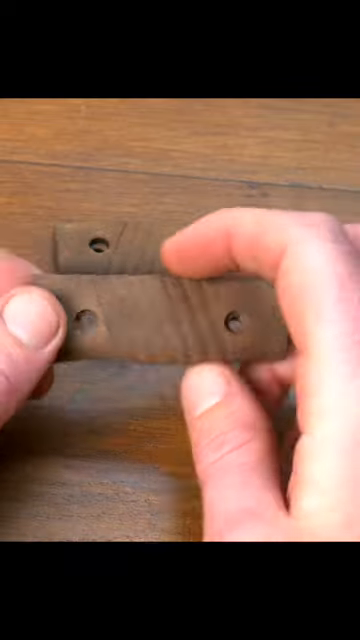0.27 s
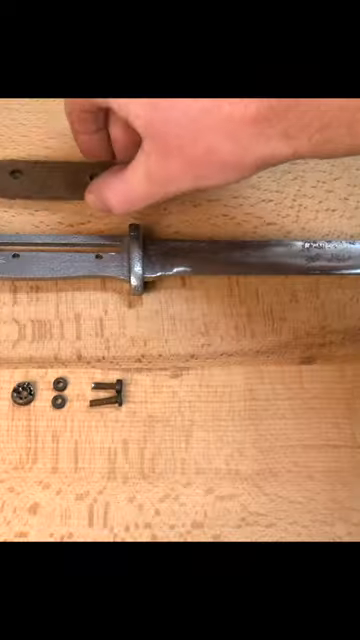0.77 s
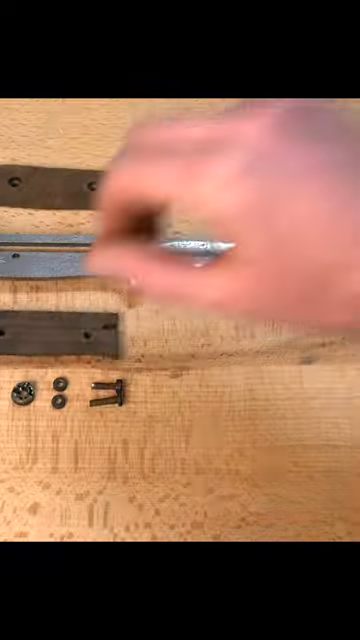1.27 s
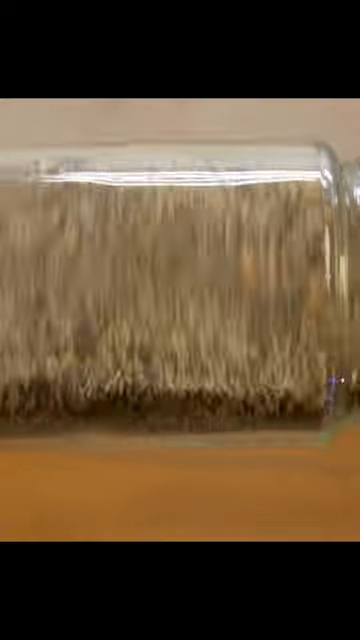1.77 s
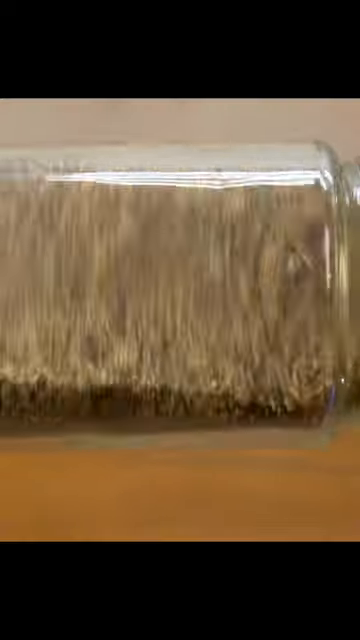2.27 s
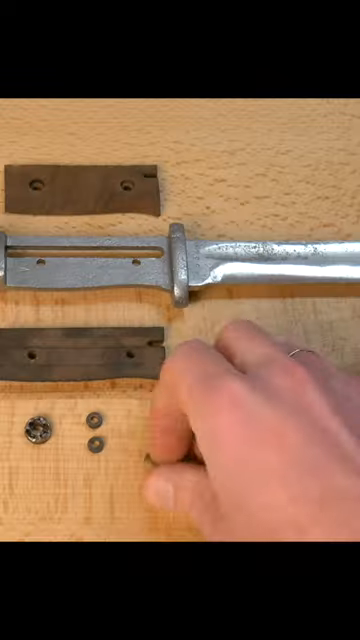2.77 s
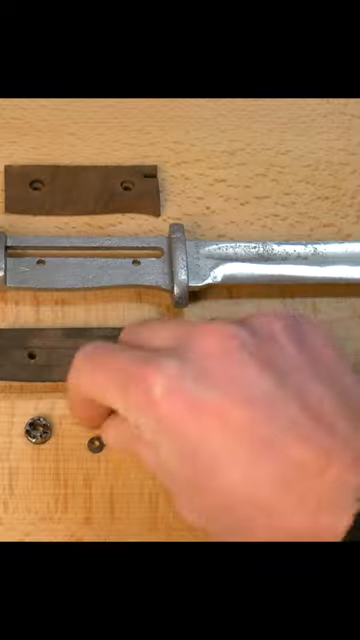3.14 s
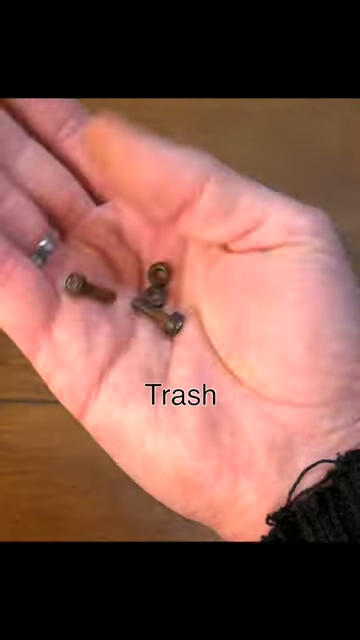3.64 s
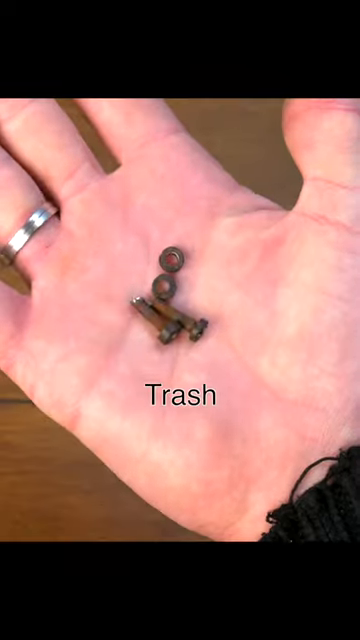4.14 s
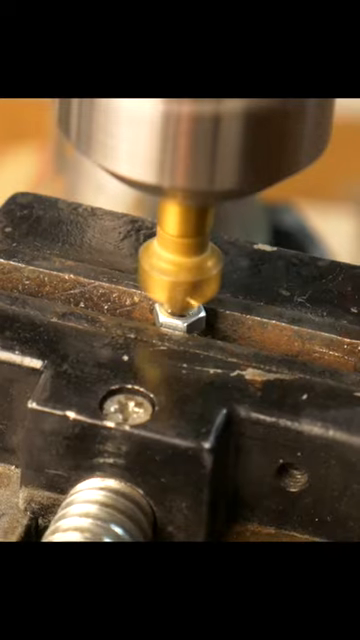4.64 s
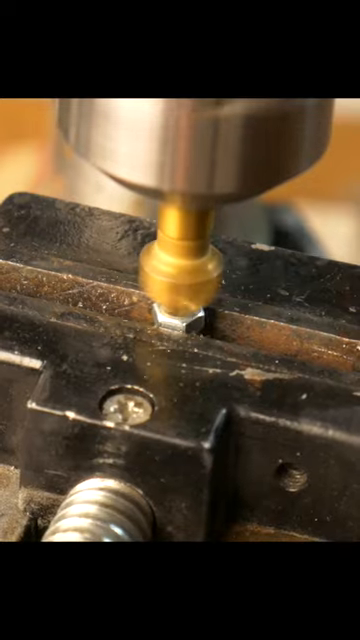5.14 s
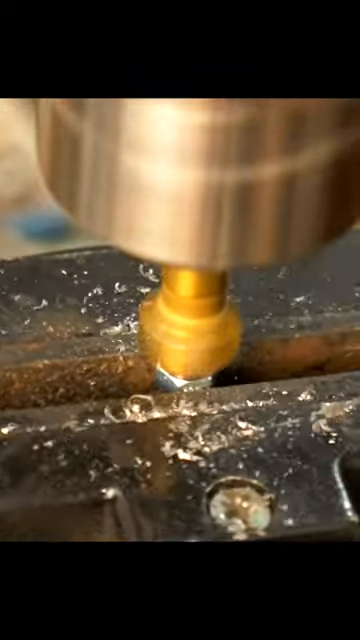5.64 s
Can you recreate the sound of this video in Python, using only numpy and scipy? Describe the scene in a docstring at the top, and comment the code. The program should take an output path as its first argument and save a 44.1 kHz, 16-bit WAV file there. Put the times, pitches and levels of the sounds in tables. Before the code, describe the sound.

Recorded closely with almost no reverberation: faint handling and one sharp wooden clack, a jar rattle and knock, then a second of steady gritty whirring. Quiet picking of small metal parts follows, then a near-silent pause, a quick bright sweep of screws with a hand thump, buzzing drill-press countersinking with brief squeals, and finally harsh belt grinding.

```python
"""Workshop steps in quick succession, close and dry, over a low rumble and a faint hiss.
A wooden knife grip clacks on a bench and a lidded jar is knocked: forces drive each object's resonances.
The jar then tumbles grit on a whining motor: grain noise, struck glass and wavering tones. Small parts are
picked up amid brushing fingers, then screws are swept onto a table: knocks and rubbing slips. A drill press
countersinks a nut in a vise: hum, rattle and cutting noise. A screw is ground on a belt: scratching and tones."""
import sys
import numpy as np
from scipy.fft import rfft, irfft, next_fast_len
from scipy.io import wavfile
from scipy.ndimage import map_coordinates

SR = 44100
rng = np.random.default_rng(int(sys.argv[2]) if len(sys.argv) > 2 else 0)


def put_to_file(sound):
    """Save the sound as 16-bit audio at rate SR, in the file named by the first command-line argument."""
    columns = np.atleast_2d(sound).T  # one column per channel
    safe = np.clip(columns, -1, 1)
    whole_steps = np.round(safe * 32767)
    wavfile.write(sys.argv[1], SR, whole_steps.astype(np.int16))


N = 260631
TIME = np.arange(N) / SR


def amp(db):
    """Logarithmic level: decibels to amplitude gain."""
    return 10 ** (np.asarray(db) / 20)


def unit(x):
    """Normalisation: scale to rms 1."""
    return x / np.sqrt(np.mean(x ** 2) + 1e-20)


def curves(rows):
    """Linear interpolation: one value per sample for each column after the time."""
    s, *columns = np.transpose(rows)
    return [np.interp(TIME, s, column) for column in columns]


def wobble(rate):
    """Slow random modulation: a smooth curve through rate random knots a second."""
    knots = rng.standard_normal(int(N * rate / SR) + 4)
    return map_coordinates(knots, [TIME * rate])


def gate(start, end, fade):
    """Switching envelope: 1 between start and end, with linear ramps of fade seconds just inside."""
    return np.clip((TIME - start) / fade, 0, 1) * np.clip((end - TIME) / fade, 0, 1)


def filtered(x, response):
    """Linear filtering: multiply the spectrum by a complex response of frequency."""
    size = next_fast_len(x.shape[-1] + 8192)  # padding gives the response room to ring out
    spectrum = rfft(x, size) * response(np.fft.rfftfreq(size, 1 / SR))
    return irfft(spectrum, size)[..., :x.shape[-1]]


def coloured(x, spectrum):
    """Spectral shaping: x weighted by (Hz, dB) points joined on a log-frequency axis, at rms 1."""
    f, db = np.transpose(spectrum)
    return unit(filtered(x, lambda hz: amp(np.interp(np.log(hz + 1), np.log(f + 1), db))))


def ringing(x, modes):
    """Modal response: a body's resonances summed, keeping the power of a white input."""
    def response(f):
        total = 0
        for k, (centre, width, db) in enumerate(modes):
            resonance = 1j * f * width / (centre * centre - f * f + 1j * f * width)
            total = total + (-1) ** k * amp(db) * resonance  # neighbours have opposite signs
        return total / np.sqrt(np.mean(abs(total) ** 2))
    return filtered(x, response)


def softened(force, hz):
    """Contact compliance: a softer contact passes less treble, as a second-order low-pass at hz."""
    return filtered(force, lambda f: 1 / (1 + 1j * np.sqrt(2) * f / hz - (f / hz) ** 2))


def grains(rate, size=N):
    """Shot noise: tiny impacts of random strength, on average rate a second, at rms 1."""
    return unit(rng.standard_normal(size) * (rng.random(size) < rate / SR))


def tones(lines, drift, flicker_db):
    """Rotating-machine lines: tones (Hz, dB) follow one wavering speed, each swelling on its own."""
    clock = np.cumsum(1 + drift * wobble(7)) / SR
    total = 0
    for hz, db in lines:
        level = np.sqrt(2) * amp(db + flicker_db * wobble(18))
        total = total + level * np.sin(2 * np.pi * (hz * clock + rng.random()))
    return total


# spectra of the room's rumble and hiss: pitch_hz [Hz], level_db [dB per Hz, relative]
RUMBLE = [(12, -37), (20, -5.5), (97, -4), (217, -13), (377, -32.5), (409, -44), (443, -41), (500, -41),
          (650, -81), (1100, -120)]
HISS = [(180, -40), (300, -2), (366, -2), (404, -9), (439, -2), (535, -7), (2360, -17.5), (15500, -28.5)]
# mean level of the rumble: time_s [s], level_db [dB]
RUMBLE_LEVEL = [(0, -64.5), (1.1, -65), (2.6, -56.5), (3.35, -59.5), (3.9, -56)]
RUMBLE_SWAY_DB, HISS_DB = 2, -69.5


def room():
    """Ambient noise: a gently swaying low rumble under a faint, steady hiss, both filtered random noise."""
    rumble_db, = curves(RUMBLE_LEVEL)
    rumble = amp(rumble_db + RUMBLE_SWAY_DB * wobble(11)) * coloured(rng.standard_normal(N), RUMBLE)
    return rumble + amp(HISS_DB) * coloured(rng.standard_normal(N), HISS)


# skin brushing wood and steel: middle_s [s], level_db [dB], half_length_s [s]
BRUSHES = [(0.301, -64.5, 0.027), (0.539, -64, 0.0088), (1.36, -59.5, 0.032), (3.941, -56.5, 0.0078)]
# soft pushes of the hand on the bench: start_s [s], level_db [dB before the envelope],
# pitch_hz [Hz], decay_s [s]
THUMPS = [(0.551, -44.5, 25, 0.066), (1.488, -43, 70.5, 0.064), (1.596, -37.5, 88.6, 0.043),
          (4.381, -33.5, 70.4, 0.042), (4.435, -24.5, 94, 0.014)]
PUSH_RISE_S = 0.002
FUMBLE_START_S, FUMBLE_END_S = 2.2, 3.65  # fingers keep nudging small parts while picking them up
FUMBLE_DB, FUMBLE_SWAY_DB = -74.5, 2


def hands():
    """Friction and damped oscillation: fingers brush as shaped grain noise, pushes are decaying low sines."""
    strokes = sum(amp(db) * np.exp(-.5 * ((TIME - s) / half) ** 2) for s, db, half in BRUSHES)
    fumble = amp(FUMBLE_DB + FUMBLE_SWAY_DB * wobble(20))
    strokes += gate(FUMBLE_START_S, FUMBLE_END_S, 0.022) * fumble
    skin = [(150, -23), (700, 3.0), (1700, 0.5), (4000, -3.5), (8000, -8), (12000, -21.5), (15000, -36)]
    sound = strokes * coloured(grains(6000), skin)
    for s, db, hz, decay in THUMPS:
        t = np.maximum(TIME - s, 0)
        envelope = np.exp(-t / decay) * (1 - np.exp(-t / PUSH_RISE_S))
        sound += amp(db) * np.sin(2 * np.pi * hz * t) * envelope
    return sound


# spectrum of grains on grains: pitch_hz [Hz], level_db [dB per Hz, relative]
GRIT = [(35, -50), (60, -8), (98, -25), (272, -11.5), (368, -6.5), (559, -25), (627, -6), (1100, -17.5),
        (1450, -18.5), (3500, -15.5), (4030, -10), (4320, -16.5), (7030, -28), (7900, -23.5),
        (15500, -45.5)]
# resonances of the glass jar: pitch_hz [Hz], width_hz [Hz], level_db [dB, relative]
GLASS = [(479, 30, 7), (653, 40, -1), (873, 83, 2), (1244, 42, -0.5), (1440, 54, -1.5), (1740, 160, -1.5),
         (1980, 35, -12), (2170, 41, -2), (2810, 48, -1)]
# gear tones: pitch_hz [Hz], level_db [dB before flicker]
GEARS = [(102, -58.5), (199, -65.5), (238, -60.5), (635, -54.5), (850, -63.5), (972, -61.5), (1470, -59.5),
         (1687, -64), (1938, -61.5)]
# motor whine: shaft_order [multiples of shaft speed], level_db [dB, relative], flutter_rad [radians]
WHINE = [(3, -15, 0), (4, -21, 0), (32, 0, .07), (64, -23, .7), (96, -34, .6)]
TUMBLE_START_S, TUMBLE_END_S = 1.681, 2.603
GRIT_DB, WHINE_DB = -45.3, -34.5


def tumbler(shaft_hz=122.56):
    """Granular impact and phase modulation: grit rings the glass; the whine flutters once a shaft turn."""
    # a fine hiss of grains on grains, and coarser hits that ring the glass
    impacts = coloured(grains(9000), GRIT) + amp(-2.5) * ringing(grains(3000), GLASS)
    grit = amp(GRIT_DB + 0.87 * wobble(24.94)) * impacts
    turn = 2 * np.pi * np.cumsum(shaft_hz * (1 + .0003 * wobble(25))) / SR  # shaft angle, radians
    whine = sum(amp(db) * np.sin(round(k) * turn + depth * np.sin(turn)) for k, db, depth in WHINE)
    motor = amp(WHINE_DB + 0.31 * wobble(120)) * unit(whine)
    motor += tones(GEARS, drift=0.00685, flicker_db=4.5)
    return gate(TUMBLE_START_S, TUMBLE_END_S, 0.025) * (grit + motor)


# spectrum of the scratching: pitch_hz [Hz], level_db [dB per Hz, relative]
BELT = [(60, -14), (200, -17), (330, -10), (500, 2), (900, -2.5), (1700, -2), (2150, -6), (3200, 1),
        (4900, -5), (6000, -15), (6900, -11.5), (9000, -8.5), (11500, -20), (15500, -27)]
# machine tones: pitch_hz [Hz], level_db [dB before flicker and mixing]
SANDER = [(105, -76), (545, -40.5), (657, -40.5), (761, -40.5), (2908, -59), (3203, -42)]
# the screw touches the belt, then is pressed home over PRESS_S
GRIND_START_S, PRESS_S, TOUCH_DB, PRESSED_DB = 5.719, .06, -34.5, -31


def belt_sander():
    """Abrasive friction: grains scratch the screw head, louder as it is pressed in, over machine tones."""
    pressed = [GRIND_START_S, GRIND_START_S + PRESS_S]
    pressure_db = np.interp(TIME, pressed, [TOUCH_DB, PRESSED_DB])
    scratch = amp(pressure_db + 0.74 * wobble(180)) * coloured(grains(9000), BELT)
    machine = amp(-5.5) * tones(SANDER, drift=0.0026, flicker_db=3.0)
    return gate(GRIND_START_S, 6.5, 0.0079) * (scratch + machine)  # still grinding at the end


# level of the motor's hum, which sags as the feed loads it: time_s [s], level_db [dB before HUM_GAIN_DB]
HUM = [(4.58, -30.5), (4.604, -32), (4.882, -30.5), (5.096, -34.5), (5.182, -46), (5.274, -33), (5.45, -28),
       (5.7, -33)]
# spectra of the rattle before and after seating, and of the cut: pitch_hz [Hz], level_db [dB per Hz, relative]
RATTLE_EARLY = [(30, -22.5), (70, -13), (130, -29), (200, -10.5), (255, -15), (325, 1.5), (385, -7),
                (435, -2.5), (520, -7.5), (750, -14.5), (1300, -28), (2500, -120)]
RATTLE_LATE = [(30, -12), (70, -4), (140, -23), (200, -5), (240, -19.5), (350, -6.5), (440, -2), (530, 1),
               (620, -4.5), (750, -21), (1300, -49), (2500, -120)]
CUT = [(400, -27), (700, -3.5), (850, -3), (1050, -0.5), (1400, -5), (2000, -11), (3800, -20),
       (4700, -21.5), (6700, -33), (8700, -32), (11000, -50), (12500, -48), (15000, -68)]
# resonances of the press's column and table, the vise and the cutter:
# pitch_hz [Hz], width_hz [Hz], level_db [dB, relative]
FRAME = [(333.7, 32, -1.5), (429.3, 19, 2.5), (524, 19, -7)]
VISE = [(1163, 37, 5), (3540, 78, 5), (4290, 130, -1), (7200, 140, -8), (11800, 150, -14.5)]
CUTTER = [(4780, 100, -0.5), (6000, 99, -6), (10330, 80, -7.5), (11040, 90, -8), (13250, 160, -13)]
DRILL_START_S, DRILL_END_S, SEATED_S = 4.551, 5.732, 5.22
HUM_GAIN_DB = -0.5  # the hum against the rattle and the cut
CUT_DB, CUT_PER_LOAD = -42.5, 0.4  # the lightest cut; dB gained per dB that the hum sags
RATTLE_DB, EASE_S, EASE_DB_PER_S = -32.5, 5.614, 41  # the rattle dies down as the feed is eased off
SPINDLE_HZ, DIP_S, RUNOUT_DB = 11.3, 4.9, 0.1  # the rattle dips very slightly once a spindle turn


def drill_press(hum_hz=101, beat_hz=22):
    """Forced vibration: motor hums, frame rattles, chips ring vise and cutter; load lifts cut as hum sags."""
    hum_db, = curves(HUM)
    load_db = hum_db.max() - hum_db

    # once the cone is seated the rattle rises in pitch and the hum gains an octave
    deeper = np.clip((TIME - SEATED_S) / 0.0485, 0, 1)
    phase = 2 * np.pi * hum_hz * TIME + 0.12 * wobble(20)
    hum = amp(hum_db + HUM_GAIN_DB) * unit(np.sin(phase) + amp(-22) * deeper * np.sin(2 * phase))

    rattle = np.sqrt(1 - deeper) * coloured(grains(2500), RATTLE_EARLY)
    rattle += np.sqrt(deeper) * coloured(grains(2500), RATTLE_LATE)
    frame = softened(ringing(grains(2500), FRAME), 820)
    rattle = unit(rattle + amp(-2.0) * (1 - 0.32 * deeper) * frame)
    runout_db = -RUNOUT_DB * np.cos(2 * np.pi * SPINDLE_HZ * (TIME - DIP_S))
    easing_db = EASE_DB_PER_S * np.maximum(TIME - EASE_S, 0)
    rattle *= amp(RATTLE_DB + runout_db - easing_db)

    # the cutting edges bite in turn, unevenly
    beat = np.sin(2 * np.pi * np.cumsum(beat_hz + 2.53 * wobble(3.5)) / SR)
    edges_db = 0.73 * beat + 1.02 * wobble(90)
    # the ring passes mostly from vise to cutter as the cone sinks
    sinking = np.clip((TIME - 4.9) / 0.41, 0, 1)
    ring = amp(-10.5) * (1 - 0.72 * sinking) * softened(ringing(grains(3600), VISE), 3900)
    ring += amp(-20.5) * sinking * softened(ringing(grains(4000), CUTTER), 9000)
    cut = amp(CUT_DB + CUT_PER_LOAD * load_db + edges_db) * (coloured(grains(7000), CUT) + ring)
    return gate(DRILL_START_S, DRILL_END_S, 0.019) * (hum + rattle + cut)


# the cutting edge catches: middle_s [s], squeal_db [dB before softening], jolt_db [dB], half_length_s [s]
SNAGS = [(5.108, -41.5, -29.5, 0.01), (5.499, -37.5, -34, 0.0057), (5.683, -32, -33, 0.0075)]


def snags():
    """Transient excitation: a catching edge squeals through two resonances and jolts the frame."""
    squeal = softened(ringing(grains(3400), [(1230, 290, 3.5), (1800, 950, -2.5)]), 5200)
    jolt = coloured(grains(2500), RATTLE_EARLY)
    total = 0
    for s, squeal_db, jolt_db, half in SNAGS:
        swell = np.exp(-.5 * ((TIME - s) / half) ** 2)
        total = total + swell * (amp(squeal_db) * squeal + amp(jolt_db) * jolt)
    return total


# the palm sweeps the screws onto the table in one stroke; force levels come before softening and resonance
SWEEP_START_S, SWEEP_END_S = 4.342, 4.428
SWEEP_DB, SWEEP_ARCH_DB, SWEEP_JERK_DB = -27.5, 2, 1
COVERED_HZ, UNCOVERED_HZ = 5500, 12000  # brightness at the start and the end of the stroke
SWEEP_ATTACK_DB_PER_S, SWEEP_RELEASE_DB_PER_S = 750, 900


def sweep_force():
    """Sliding friction: screws skitter, strongest in mid-stroke and brighter as the palm uncovers them."""
    progress = ((TIME - SWEEP_START_S) / (SWEEP_END_S - SWEEP_START_S)).clip(0, 1)
    speed_db = -SWEEP_ARCH_DB * (2 * progress - 1) ** 2  # the hand is fastest in the middle
    fade_db = SWEEP_ATTACK_DB_PER_S * np.maximum(SWEEP_START_S - TIME, 0)
    fade_db += SWEEP_RELEASE_DB_PER_S * np.maximum(TIME - SWEEP_END_S, 0)
    slips = amp(SWEEP_DB + speed_db - fade_db + SWEEP_JERK_DB * wobble(150)) * grains(5000)
    covered = softened((1 - progress ** 2) * slips, COVERED_HZ)
    return covered + softened(progress ** 2 * slips, UNCOVERED_HZ)


# parts set down or striking each other: start_s [s], blow_db [dB, relative to the blow_db setting],
# scrape_db [dB of force], brightness_hz [Hz]
KNOCKS = [(.193, -49, -68, 14000), (.6502, -43, -49.5, 1300), (0.6802, -16.5, -38.5, 10900),
          (.822, -35, -56, 1090), (.855, -35, -46, 850), (.991, -34, -43, 750), (1.5947, -10, -35, 10100),
          (1.612, -29, -48, 12000), (2.679, -43, -56.5, 2000), (2.73, -41, -43.5, 8000),
          (2.838, -26.5, -48, 5350), (3.169, -50, -57, 6000), (3.4455, -43, -67, 3500),
          (3.527, -39.5, -56, 7100), (4.3238, -19, -35.5, 7000), (4.3458, -16, -28.5, 8000),
          (4.392, -23, -31, 6000)]
# parts pushed along or rocking: middle_s [s], level_db [dB of force], half_length_s [s], brightness_hz [Hz]
SLIDES = [(0.201, -61.5, 0.0086, 14000), (1.099, -60.5, .011, 2980), (1.487, -49.5, 0.0079, 5000),
          (1.523, -29, 0.0076, 5500), (1.572, -43.5, 0.016, 3600), (1.604, -31.5, 0.0097, 4500),
          (2.787, -47.5, 0.017, 3400), (2.887, -65, 0.022, 4500), (3.206, -54.5, 0.012, 9000),
          (3.509, -55, 0.0082, 6000), (3.592, -68.5, 0.019, 4000)]
SCRAPE_RISE_S, SCRAPE_FALL_S = 0.0071, 0.0085  # scraping into contact, and while settling


def contact_force(blow_db, chatter_db, chatter_t60, slide_rate):
    """Impact and stick-slip: blows sit in short scrapes and leave dying chatter; slides swell with tiny slips."""
    force = np.zeros(N + SR)
    t = np.arange(SR // 4) / SR
    around = t - t[-1] / 2
    scrape = np.exp(-np.maximum(-around / SCRAPE_RISE_S, around / SCRAPE_FALL_S))
    slips = []
    for s, db, half, hz in SLIDES:
        slips.append((s, amp(db) * np.exp(-.65 * (abs(around) / half) ** 1.56), hz))
    for s, db, scrape_db, hz in KNOCKS:
        blow = amp(chatter_db - 60 * t / chatter_t60) * rng.standard_normal(len(t))
        blow[0] = 1  # the blow itself, ahead of its chatter
        force[round(s * SR):][:len(t)] += amp(db + blow_db) * softened(blow, hz)
        slips.append((s, amp(scrape_db) * scrape, hz))
    for s, envelope, hz in slips:
        first = round((s + around[0]) * SR)
        force[first:][:len(t)] += softened(envelope * grains(slide_rate, size=len(t)), hz)
    return force[:N]


# resonances of the knife grip, the jar's steel lid, the jar, the bench and the table:
# pitch_hz [Hz], width_hz [Hz], level_db [dB, relative]
GRIP = [(456, 410, -1.5), (1075, 123, 4.5), (1335, 204, 4.5), (1980, 190, -2.5), (2560, 390, -3.5),
        (3300, 850, -1), (4200, 320, -1), (7530, 160, -8.5), (12500, 2500, -40)]
LID = [(459.4, 330, -4.5), (733, 76, 8), (1010, 190, -2), (1310, 230, -0.5), (2550, 440, -5),
       (3090, 120, -7), (3400, 85, 5), (3970, 470, -3.5), (7600, 730, -12.5), (10700, 700, -12),
       (13600, 900, -13)]
JAR = [(348, 280, 5.5), (535, 150, 9.5), (743, 98, 4), (981, 66, 0.5), (1300, 220, 1), (1800, 55, -6.5),
       (2300, 580, -2), (3360, 450, -3), (3920, 690, 2), (4900, 1600, -14), (7000, 480, -19),
       (9100, 1800, -9), (12300, 3100, -14)]
BENCH = [(336, 40, -3.5), (521, 37, -2.5), (842, 63, -1), (1020, 74, 0.5), (1340, 330, -2.5),
         (1940, 85, -3.5), (2330, 130, 1.5), (3130, 79, -4.5), (3360, 86, -7), (4080, 160, -5.5),
         (4600, 460, -11), (9400, 4000, -40)]
TABLE = [(527, 113, -6), (695, 31, 0.5), (1024, 300, -3.5), (1360, 76, 4.5), (1555, 180, 1), (1720, 51, 7),
         (1886, 75, 2), (2210, 110, -3), (2460, 92, 2), (3066, 150, -0.5), (3360, 160, 0),
         (4430, 1460, -10.5), (8600, 3600, -23)]


def handling():
    """Source and resonator: each object in turn takes the contact forces and answers with its own modes."""
    force = contact_force(blow_db=10.5, chatter_db=-26, chatter_t60=0.039, slide_rate=5000)
    force += sweep_force()
    # start_s, end_s, resonances
    turns = [(0, 1.4, GRIP), (1.4, 1.56, LID), (1.56, 2, JAR), (2, 4.2, BENCH), (4.2, 5, TABLE)]
    return sum(ringing(force * (TIME >= start) * (TIME < end), modes) for start, end, modes in turns)


def scene():
    """Superposition: all sources add, and reach both channels alike."""
    mono = room() + hands() + tumbler() + belt_sander() + drill_press() + snags() + handling()
    return np.array([mono, mono])


TOP_HZ = 15500


def record(dry):
    """Band limiting: the response falls very steeply above TOP_HZ."""
    return filtered(dry, lambda hz: 1 / np.sqrt(1 + (hz / TOP_HZ) ** 200))


dry = scene()
out = record(dry)
put_to_file(out)
```